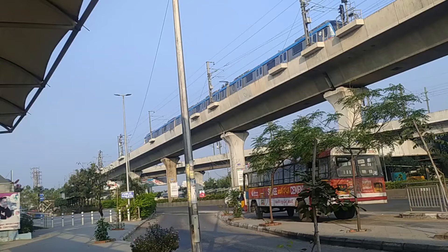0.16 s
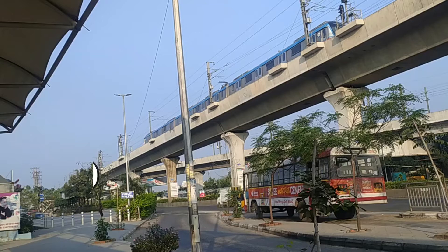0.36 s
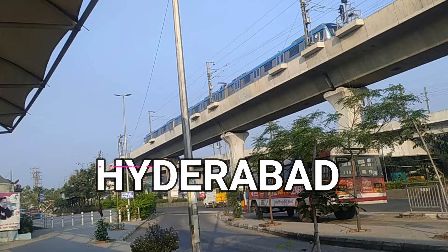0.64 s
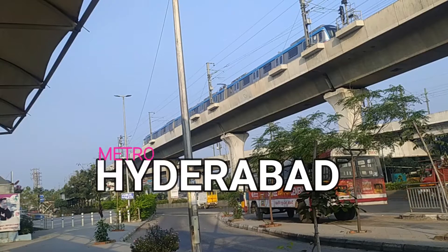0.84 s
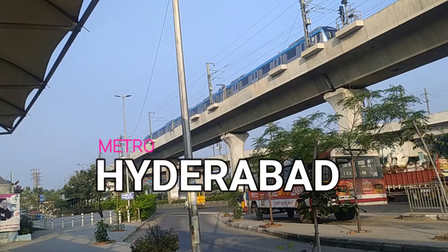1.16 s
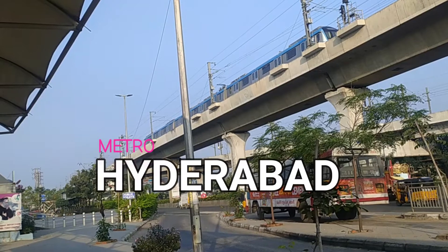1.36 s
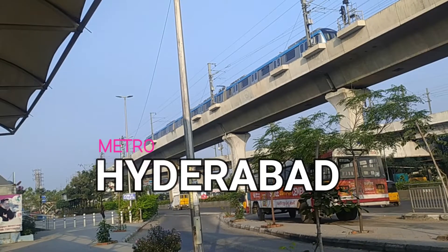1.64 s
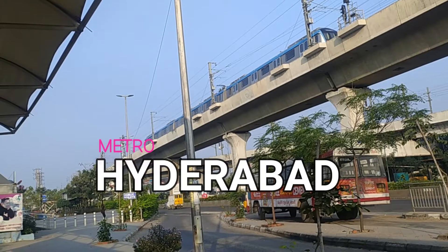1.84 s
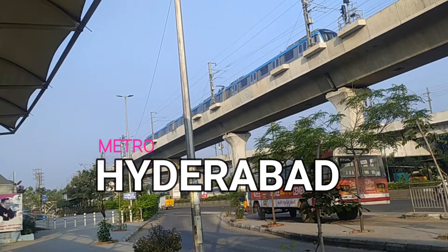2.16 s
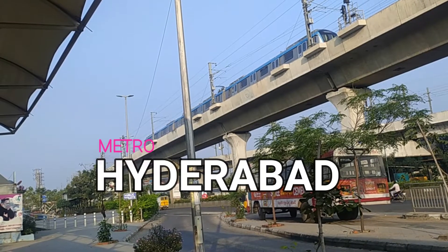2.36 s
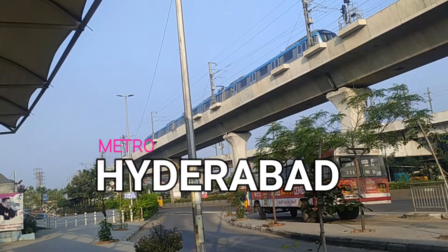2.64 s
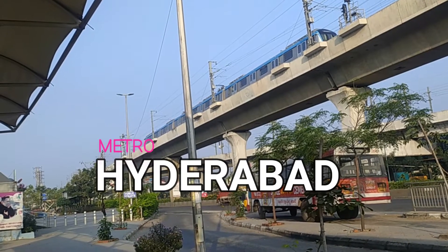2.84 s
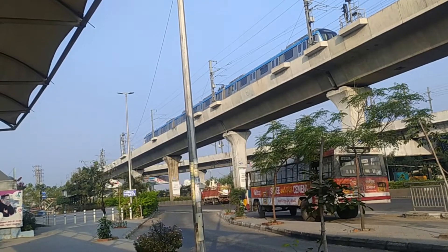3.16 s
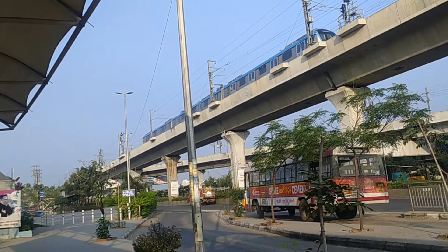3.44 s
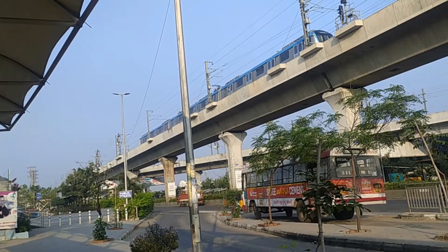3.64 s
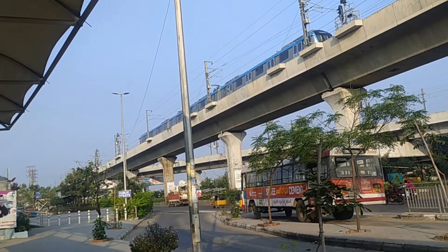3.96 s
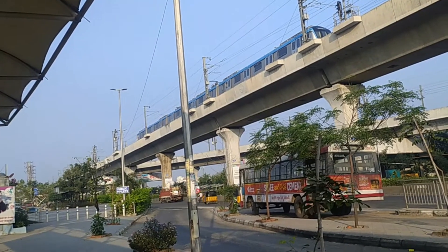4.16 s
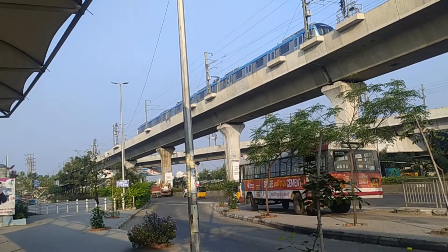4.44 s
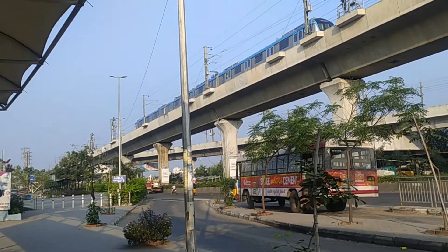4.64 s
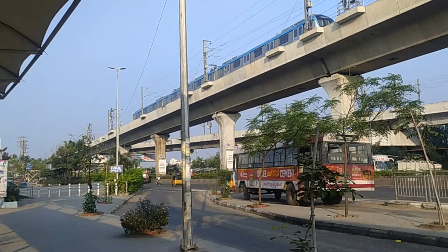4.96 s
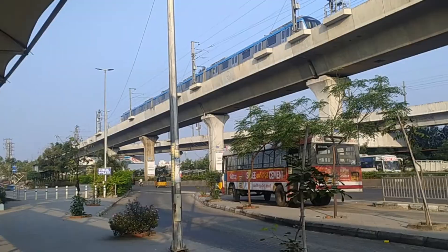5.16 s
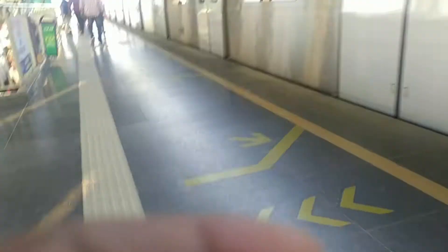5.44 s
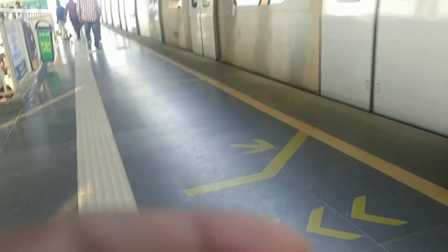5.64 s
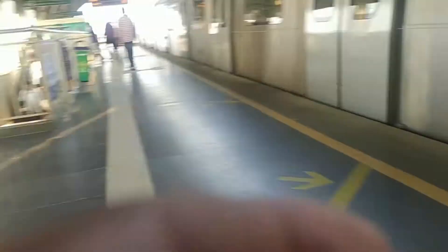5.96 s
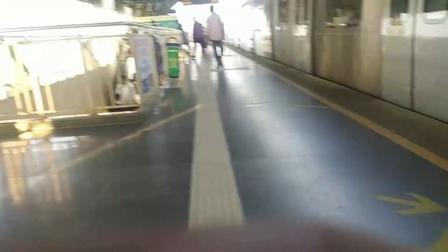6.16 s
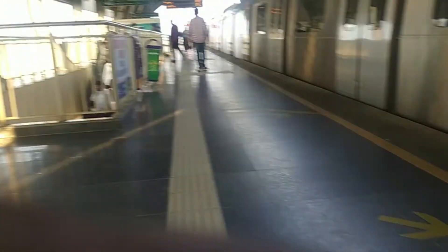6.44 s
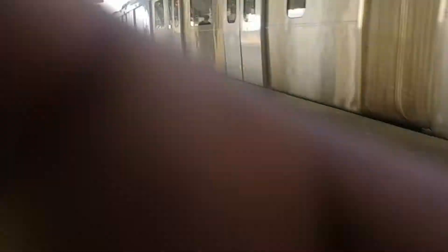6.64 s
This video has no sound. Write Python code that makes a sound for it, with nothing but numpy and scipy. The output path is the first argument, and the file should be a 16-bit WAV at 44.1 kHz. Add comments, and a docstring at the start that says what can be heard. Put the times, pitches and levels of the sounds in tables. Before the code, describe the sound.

Outdoors in wide stereo, distant engines drone over steady tyre noise, with a booming lorry, an idling bus, faint squeaky brakes and a weak far horn; air hisses just before an abrupt stop. After a short gap, an enclosed platform bursts in: diffuse roar, pulsing motor hum and wavering train whine swelling leftward, plus one small microphone tick.

```python
"""Engines drone and pull away on a road under a metro viaduct: harmonics of each firing rate through an exhaust.
Tyre noise and hiss are shaped stereo noise; whirring, thin brake chirps, a far horn and brake air join in.
After a short silence, a station platform: throbbing motor tones, gear resonances and jittering inverter whine
in a roaring hall, and a finger's decaying noise ticks against the microphone housing."""
import sys
import numpy as np
from scipy import signal
from scipy.fft import rfft, irfft, next_fast_len
from scipy.io import wavfile
from scipy.ndimage import uniform_filter1d, map_coordinates

SR = 44100
rng = np.random.default_rng(int(sys.argv[2]) if len(sys.argv) > 2 else 0)


def dump(signal):
    """Clip the signal to [-1, 1] and save it as 16-bit WAV at the path in sys.argv[1]."""
    limited = np.clip(np.atleast_2d(signal).T, -1, 1)
    pcm = np.round(limited * 32767).astype(np.int16)
    wavfile.write(sys.argv[1], SR, pcm)


N = 299439

# All colour tables are relative: the noise they shape is levelled afterwards.
# Colour of the far engines' rumble: frequency_hz, density_db (per Hz)
RUMBLE_COLOUR = [(12, -39.5), (20, -19), (55, -4), (80, -6), (105, -5), (135, -9), (195, 0.5), (270, -4.5),
                 (335, -5.5), (400, -12), (530, -10.5), (620, -26), (800, -61)]
# Colour of tyres on asphalt: frequency_hz, density_db (per Hz)
TYRE_COLOUR = [(240, -20), (400, -3), (537, -8), (595, -2.5), (1310, -0.5), (1540, -4.5), (2400, -2.5),
               (3010, -7), (3560, -9.5), (3810, -10.5), (5120, -17.5), (6000, -16.5), (7800, -16.5),
               (13200, -120)]
# Colour of the treble hiss: frequency_hz, density_db (per Hz)
HISS_COLOUR = [(2820, -10.5), (4800, -6), (5180, -8.5), (7320, -5), (8620, 1), (9400, 0), (10300, -8),
               (12500, -19.5), (14200, -39)]
# Level course of the hiss before a common trim: time_s, level_db
HISS_COURSE = [(0.5, -41.5), (0.91, -38.5), (1.4, -40.5), (1.62, -36.5), (2.32, -39.5), (3.05, -40.5),
               (3.17, -37.5), (3.3, -39.5), (4.47, -43), (5.25, -42.5)]
# Stereo likeness of the street: frequency_hz, left_right_correlation (-1 to 1)
STREET_LIKENESS = [(25, .88), (60, .97), (130, .95), (290, .88), (640, .43), (1400, -.14), (3000, .12),
                   (6700, 0)]
# Stereo lean of the street: frequency_hz, left_minus_right_db
STREET_BALANCE = [(200, 0.5), (700, 0), (1280, 1.5), (2400, 4.5), (4400, 4.5), (8000, 4)]
# Passing engines, one curve each: time_s, firing_hz, level_db (before the exhaust's resonance)
ENGINE_PASSES = [
    [(0.4, 141.5, -28), (0.57, 141.5, -30), (0.76, 145.5, -29), (1, 144, -44)],
    [(0.6, 166, -42), (0.72, 165, -31), (1, 162, -38), (1.3, 169, -33.5), (2.1, 159, -45), (2.25, 159, -33),
     (2.5, 158, -48)],
    [(2.25, 118, -45), (2.7, 125, -38), (3.05, 132.5, -32.5), (3.25, 131, -44)],
    [(3.7, 53.5, -47), (4.6, 58.3, -38), (5.12, 60.9, -32), (5.26, 61.7, -31.5), (5.5, 62, -30)],
]
# Exhaust pipe resonance: frequency_hz, gain_db
EXHAUST_RESONANCE = [(60, -8), (143, -8.5), (160, -11), (185, 0), (222, -2), (241, 4.5), (249, -0.5),
                     (285, 0), (298, -5), (310, -1.5), (335, -2.5), (355, -10), (371, -3), (395, -14),
                     (428, -8), (495, -10.5), (650, -24.5)]
# Colour of the clatter at each firing: frequency_hz, density_db (per Hz)
CLATTER_COLOUR = [(300, -29.5), (900, -0.5), (2600, -7.0), (5000, -28.0), (9000, -10.5), (13000, -41.5)]
# Booming exhaust note of a lorry: time_s, pitch_hz, level_db
LORRY_BOOM = [(1.03, 207, -61), (1.1, 208, -30), (1.23, 209, -43), (1.39, 210, -30.5), (1.6, 213, -37.5),
              (1.76, 210, -33), (2.05, 203, -36.5), (2.62, 200, -36.5), (2.85, 203, -38.5),
              (3.06, 203, -31.5), (3.5, 198, -49), (4.1, 200, -44), (4.26, 201, -35), (4.5, 200, -56)]
# Drone of an idling bus, before its level course: pitch_hz, level_db
IDLE_TONES = [(109.5, -42.5), (320, -42.5)]
# Level course of that drone: time_s, gain_db
IDLE_COURSE = [(0.55, -6), (0.75, 2.5), (2.3, -0.5), (2.8, -12), (3.9, 3), (4.8, -6.5)]
# Whirring and hissing of gearboxes and fans: centre_s, length_s, centre_hz, width_hz, peak_level_db
WHIR_PASSES = [(0.698, 1.7, 1330, 280, -38), (0.95, 1.5, 615, 260, -41), (0.95, 2.5, 338, 82.7, -37),
               (1.001, 0.7, 9050, 400, -45), (2.9, 1.3, 8450, 600, -48.5), (4.8, 0.8, 875, 160, -42.5),
               (4.949, 0.46, 9340, 480, -42.5), (4.998, 4.5, 2500, 600, -36)]
# Brake chirps: centre_s, length_s, pitch_hz (at the centre), slide_hz_per_s, level_db
BRAKE_CHIRPS = [(1.32, .09, 8080, 0, -45), (1.53, .15, 8110, -250, -41), (1.63, .09, 8560, 900, -45),
                (2.05, .12, 8350, 200, -46), (2.45, .16, 8860, -700, -45.5), (2.75, .15, 8025, 350, -42.5),
                (2.84, .1, 8740, 400, -45.5)]
# Colour of the air let out of a brake: frequency_hz, density_db (per Hz)
BRAKE_AIR_COLOUR = [(3000, -43.5), (5500, -7.5), (7200, 1), (9000, -1), (11500, -33)]
# Horn partials, on top of the horn's level: multiple, gain_db
HORN_PARTIALS = [(1, 5), (9, -3), (10, -4), (11, -3)]
# Brief flares of single horn partials: centre_s, length_s, multiple, level_db
HORN_FLARES = [(3.8, .06, 10, -42.5), (3.92, .16, 11, -45), (3.975, .1, 10, -43), (4.3, .06, 10, -45),
               (4.5, .05, 10, -46), (4.05, .07, 10, -37.5), (4.22, .1, 10, -35.5), (4.31, .09, 9, -42.5),
               (4.385, .05, 10, -42), (4.41, .08, 9, -44), (4.44, .045, 10, -39)]
# Colour of the station hall's roar: frequency_hz, density_db (per Hz)
HALL_COLOUR = [(25, -4.5), (60, -1.5), (130, -5.5), (400, 0.5), (900, 1), (1040, -3), (1300, -7.5),
               (2000, -5), (2800, -5.5), (3250, -12.5), (3600, -16), (4000, -14), (5500, -21.5),
               (9400, -16.5), (11000, -30), (14200, -47.5)]
# Stereo likeness of the hall: frequency_hz, left_right_correlation (-1 to 1)
HALL_LIKENESS = [(60, 0.93), (290, 0.87), (640, 0.48), (1400, -0.16), (3000, 0.016), (6700, -0.022)]
# Stereo lean of the hall: frequency_hz, left_minus_right_db
HALL_BALANCE = [(200, 0.82), (700, -0.5), (1300, 1.6), (2400, -0.18), (8000, -1.5)]
# Swelling resonances of gears and running gear: centre_s, length_s, centre_hz, width_hz, level_db
GEAR_SWELLS = [(6.3, 1.4, 194, 69, -39), (6.32, .2, 500, 70, -38), (6.45, .3, 810, 120, -37),
               (6.68, .2, 760, 220, -33.5)]
# Inverter whine bands: centre_hz, width_hz, far_level_db, nearest_gain_db,
# far_left_minus_right_db, nearest_added_left_minus_right_db
WHINE_BANDS = [(1660, 155, -38.5, 7, -5, 15), (2475, 235, -33, 0, -4, 8)]
# Surges, one row for the lower and one for the upper whine band: centre_s
WHINE_SURGES = [
    [5.96, 6.265, 6.39, 6.44, 6.5, 6.59, 6.69, 6.79],
    [5.83, 6.02, 6.11, 6.37, 6.58, 6.66],
]
# Traction motor tones: pitch_hz, steady_level_db
MOTOR_TONES = [(188.4, -45), (372.5, -46), (558, -50), (743.5, -43.5), (995.5, -42), (1097.5, -43.5),
               (1195.5, -48), (1793, -48)]
# Throbs of single motor tones: centre_s, length_s, tone_hz, level_db
MOTOR_THROBS = [(5.805, .075, 743.5, -27.5), (5.965, .055, 743.5, -27.5), (5.98, .14, 995.5, -35),
                (6.135, .08, 188.4, -31), (6.18, .07, 743.5, -34), (6.21, .16, 995.5, -34.5),
                (6.275, .05, 743.5, -30.5), (6.37, .06, 743.5, -27.5), (6.42, .14, 995.5, -36),
                (6.57, .08, 558, -35), (6.62, .05, 743.5, -30.5), (6.66, .2, 995.5, -38.5),
                (6.705, .065, 743.5, -27.5), (6.75, .14, 558, -34)]
# Finger ticks on the microphone housing: start_s, level_db
FINGER_TICKS = [(6.4208, -19.5), (6.4242, -27.5)]
# Colour of the ticks: frequency_hz, density_db (per Hz)
TICK_TIMBRE = [(2000, -22), (4500, -3), (7000, -2), (10000, 5), (12500, -9), (14200, -22)]

# Start and end of each scene in seconds
STREET_SPAN_S, PLATFORM_SPAN_S = (0.4585, 5.43), (5.772, 6.8)
TOP_HZ = 14300
RUMBLE_DB, TYRE_DB, HISS_TRIM_DB = -31.5, -32, 0.74
# Rolling noise sits a little left and swings right while a vehicle goes by on that side
ROLLING_LEAN_DB, TYRE_SWING_DB, WHIR_SWING_DB = 1, -4, -12
SWING_AT_S, SWING_WIDTH_S = 4.98, 0.34
ENGINE_FADE_S, CLATTER_DB = 0.075, -5.0
CHIRP_JITTER_HZ = 22
# The brake air swells until it is fully open, then holds
AIR_OPEN_S, AIR_RISE_DB_PER_S, AIR_DB = 5.33, 131.5, -39
HORN_START_S, HORN_END_S, HORN_DB = 3.77, 4.54, -47.5
HORN_START_HZ, HORN_SAG_HZ_PER_S = 350.2, 3.3
ROAR_DB = -28.5
# A motor car's nearest moment, and the time it takes to roll its own distance from the ear
CAR_NEAREST_S, CAR_PASS_S = 6.56, 0.34
SURGE_S, SURGE_DB = 0.06, 3
# Pitch jitter as a share of the band's width, and the share of power that is hall wash
WHINE_SPREAD, WHINE_WET = 0.42, 0.45
TICK_DECAY_S = 0.013  # time to fall 60 dB


def amp(db):
    """Decibels to gain."""
    return 10 ** (np.asarray(db) / 20)


def unit(x):
    """Scale to rms 1."""
    return x / np.sqrt(np.mean(x ** 2) + 1e-20)


def clock():
    """Time of each sample in seconds."""
    return np.arange(N) / SR


def along(points, hz):
    """Read (frequency, value) points on a log frequency axis."""
    f, v = np.transpose(points)
    return np.interp(np.log(hz + 1), np.log(f + 1), v)


def curves(rows):
    """One value per sample for each column after the time."""
    s, *columns = np.transpose(rows)
    return [np.interp(clock(), s, column) for column in columns]


def gate(start, end, fade):
    """One between two times, with linear edges."""
    return np.clip(np.minimum(clock() - start, end - clock()) / fade, 0, 1)


def swell(s, length):
    """A rounded rise and fall centred on time s."""
    return np.sqrt(gate(s - length / 2, s + length / 2, fade=length / 2))


def nearness(s, width):
    """Inverse-square closeness of something rolling past: 1 at time s, one half a width earlier or later."""
    return 1 / (1 + ((clock() - s) / width) ** 2)


def wobble(rate):
    """A smooth random curve, rate knots a second."""
    coarse = np.linspace(0, N / SR, 4000)
    knots = rng.standard_normal(int(N * rate / SR) + 4)
    smooth = map_coordinates(knots, [coarse * rate], mode="nearest")
    return np.interp(clock(), coarse, smooth)


def cycles(hz):
    """Running phase of a changing frequency."""
    return 2 * np.pi * np.cumsum(hz) / SR


def filtered(x, response):
    """Multiply the spectrum of x by a response of frequency."""
    m = next_fast_len(N + 8192)
    return irfft(rfft(x, m) * response(np.fft.rfftfreq(m, 1 / SR)), m)[..., :N]


def pan(lean_db):
    """Left and right gains of constant power from a left minus right level."""
    gains = amp(np.outer([.5, -.5], lean_db))
    return gains / np.sqrt(np.mean(gains ** 2, axis=0))


def patchy(patchy_db):
    """Two white noises sharing random patches of gain in time and frequency."""
    z = signal.stft(rng.standard_normal((2, N)), nperseg=512)[2]
    field = rng.standard_normal(z.shape[1:])
    field = uniform_filter1d(field, size=6, axis=0)
    field = uniform_filter1d(field, size=16, axis=1)
    return signal.istft(z * amp(patchy_db * unit(field)), nperseg=512)[1][:, :N]


def diffuse(pair, colour, alike, lean):
    """Colour two noises and mix them into a stereo field whose middle has rms 1."""
    def middle_and_side(hz):
        # This angle shares power so that the ears correlate as the likeness table asks
        angle = np.arccos(np.clip(along(alike, hz), -1, 1)) / 2
        return colour(hz) * np.array([np.cos(angle), np.sin(angle)])

    mid, side = filtered(pair, middle_and_side)
    ears = np.array([mid + side, mid - side])
    ears = filtered(ears, lambda hz: amp(np.outer([.5, -.5], along(lean, hz))))
    return ears / np.std(ears.mean(0))


def street_noise(spectrum, patchy_db):
    """Noise arriving from the whole road."""
    return diffuse(patchy(patchy_db), lambda hz: amp(along(spectrum, hz)), STREET_LIKENESS, STREET_BALANCE)


def narrow_noise(centre, width, alike, lean):
    """Noise ringing in one steep resonance."""
    return diffuse(patchy(1.3), lambda hz: 1 / (1 + (2 * (hz - centre) / width) ** 2), alike, lean)


def scattered(phase, share, rate):
    """A tone of about rms 1 with a share of its power in reflections that fade differently at each ear."""
    echoes = np.array([wobble(rate) * np.sin(phase) + wobble(rate) * np.cos(phase) for ear in range(2)])
    share = np.clip(share, 0, 1)
    return np.sqrt(2 * (1 - share)) * np.sin(phase) + np.sqrt(share) * echoes


def road_pan(swing_db):
    """Stereo place of the rolling noise, swinging as a vehicle goes by."""
    return pan(ROLLING_LEAN_DB + swing_db * nearness(SWING_AT_S, SWING_WIDTH_S))


def road():
    """Far engines rumble, tyres roar and hiss on the asphalt: three wavering bands of noise."""
    hiss_db, = curves(HISS_COURSE)
    rumble = amp(RUMBLE_DB + 0.93 * wobble(14)) * street_noise(RUMBLE_COLOUR, patchy_db=-0.7)
    tyres = amp(TYRE_DB + 0.8 * wobble(24.94)) * street_noise(TYRE_COLOUR, patchy_db=0.77)
    hiss = amp(hiss_db + HISS_TRIM_DB + 0.69 * wobble(40)) * street_noise(HISS_COLOUR, patchy_db=1.6)
    return rumble + tyres * road_pan(TYRE_SWING_DB) + hiss


def engines(count=8):
    """Multiples of each firing rate sound through the exhaust pipe; every firing also gives a puff of clatter."""
    drone, puffs = np.zeros(N), np.zeros(N)
    for rows in ENGINE_PASSES:
        firing_hz, level_db = curves(rows)
        phase = cycles(firing_hz * (1 + 0.004 * wobble(21.82)))
        level = amp(level_db) * gate(rows[0][0], rows[-1][0], fade=ENGINE_FADE_S)
        for order in range(1, count + 1):
            pipe_db = along(EXHAUST_RESONANCE, order * firing_hz) + 1.1 * wobble(9)
            drone += level * amp(pipe_db) * np.sin(order * phase + rng.uniform(0, 2 * np.pi))
        # One smooth pulse per firing
        puffs += level * np.exp(3.2 * (np.cos(phase) - 1))
    return drone + amp(CLATTER_DB) * puffs * street_noise(CLATTER_COLOUR, patchy_db=-0.5)


def idling_bus():
    """Two unsteady tones drone as the bus idles."""
    course_db, = curves(IDLE_COURSE)
    drone = np.zeros(N)
    for hz, db in IDLE_TONES:
        level = amp(db + course_db + 1.5 * wobble(7))
        drone += level * np.sin(cycles(hz * (1 + 0.00772 * wobble(14))))
    return drone


def lorry():
    """A lorry's exhaust booms on one drifting note with scattered reflections."""
    boom_hz, boom_db = curves(LORRY_BOOM)
    return amp(boom_db) * scattered(cycles(boom_hz), share=0.13, rate=12)


def whirs():
    """Gearboxes and fans whirr in narrow noise bands that swell and fade as vehicles go by."""
    sound = np.zeros((2, N))
    for s, length, hz, width, db in WHIR_PASSES:
        resonance = narrow_noise(hz, width, STREET_LIKENESS, STREET_BALANCE)
        sound += amp(db) * swell(s, length) ** 2 * resonance  # squared: straight rise and fall
    return sound * road_pan(WHIR_SWING_DB)


def brake_chirps():
    """Pads chirp thinly on their discs: jittering tones that may slide, a little to the left."""
    chirps = np.zeros((2, N))
    for s, length, hz, slide, db in BRAKE_CHIRPS:
        pitch_hz = hz + slide * (clock() - s) + CHIRP_JITTER_HZ * wobble(70)
        chirps += amp(db) * swell(s, length) * scattered(cycles(pitch_hz), share=0.3, rate=80)
    return chirps * amp([[1.5], [-1.5]])


def horn():
    """A far disc horn sags in pitch; only its fundamental and partials near its plate resonance stand out."""
    hz = HORN_START_HZ - HORN_SAG_HZ_PER_S * (clock() - HORN_START_S)
    phase = cycles(hz * (1 + 0.00066 * wobble(30)))
    held = amp(HORN_DB) * gate(HORN_START_S, HORN_END_S, fade=0.037)
    sound = np.zeros((2, N))
    for order, db in HORN_PARTIALS:
        flares = np.zeros(N)
        for s, length, partial, peak_db in HORN_FLARES:
            if partial == order:
                flares += amp(peak_db) * swell(s, length)
        level = np.hypot(amp(db) * held, flares)
        sound += level * scattered(order * phase, share=0.15, rate=25)
    return sound


def brake_air():
    """Air let out of a brake: turbulent noise swelling as the valve opens."""
    air_db = AIR_DB - AIR_RISE_DB_PER_S * np.maximum(AIR_OPEN_S - clock(), 0)
    return amp(air_db) * street_noise(BRAKE_AIR_COLOUR, patchy_db=-0.5)


def hall_roar():
    """The station hall roars steadily: diffuse coloured noise."""
    roar = diffuse(patchy(0.93), lambda hz: amp(along(HALL_COLOUR, hz)), HALL_LIKENESS, HALL_BALANCE)
    return amp(ROAR_DB) * roar


def motors():
    """Wavering traction motor tones throb one by one over their steady level."""
    sound = np.zeros((2, N))
    for hz, db in MOTOR_TONES:
        throbs = np.zeros(N)
        for s, length, tone_hz, peak_db in MOTOR_THROBS:
            if tone_hz == hz:
                throbs += amp(peak_db) * swell(s, length)
        phase = cycles(hz * (1 + 0.0035 * wobble(20)))
        sound += np.hypot(amp(db), throbs) * scattered(phase, share=0.12, rate=22)
    return sound


def whine_band(centre, width):
    """A tone of even strength that jitters quickly across its band, plus its wash in the hall."""
    pitch_hz = centre + WHINE_SPREAD * width * np.array([wobble(width), wobble(width)])
    direct = np.array([np.sin(cycles(hz)) for hz in pitch_hz])
    direct /= np.std(direct.mean(0))
    wash = narrow_noise(centre, width, HALL_LIKENESS, HALL_BALANCE)
    return np.sqrt(1 - WHINE_WET) * direct + np.sqrt(WHINE_WET) * wash


def inverter():
    """Two whine bands surge and swing left as a motor car passes; the lower also swells with its nearness."""
    near = nearness(CAR_NEAREST_S, CAR_PASS_S)
    sound = np.zeros((2, N))
    for band, surges in zip(WHINE_BANDS, WHINE_SURGES):
        centre, width, far_db, gain_db, lean_db, swing_db = band
        surge_db = SURGE_DB * sum(swell(s, SURGE_S) for s in surges)
        level = amp(far_db + gain_db * near + surge_db)
        sound += level * pan(lean_db + swing_db * near) * whine_band(centre, width)
    return sound


def gears():
    """Gears and running gear drone: narrow noise resonances that swell and fade."""
    sound = np.zeros((2, N))
    for s, length, centre, width, db in GEAR_SWELLS:
        sound += amp(db) * swell(s, length) * narrow_noise(centre, width, HALL_LIKENESS, HALL_BALANCE)
    return sound


def finger():
    """Tiny dry ticks on the microphone housing: noise that starts at once and dies exponentially."""
    decay = np.zeros(N)
    for s, db in FINGER_TICKS:
        decay += amp(db - 60 * np.abs(clock() - s) / TICK_DECAY_S) * (clock() >= s)
    noise = filtered(rng.standard_normal((2, N)), lambda hz: amp(along(TICK_TIMBRE, hz)))
    return decay * unit(noise)


def scene():
    """First the street, then the platform, with silence around them."""
    street = road() + engines() + idling_bus() + lorry() + whirs() + brake_chirps() + horn() + brake_air()
    platform = hall_roar() + motors() + inverter() + gears() + finger()
    return street * gate(*STREET_SPAN_S, fade=0.0017) + platform * gate(*PLATFORM_SPAN_S, fade=0.0031)


def record(dry):
    """Limit the band: the treble falls away over the last 100 Hz and nothing is left above the top."""
    return filtered(dry, lambda hz: np.clip((TOP_HZ - hz) / 100, 0, 1))


dry = scene()
out = record(dry)
dump(out)
```